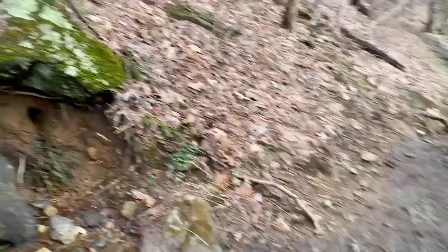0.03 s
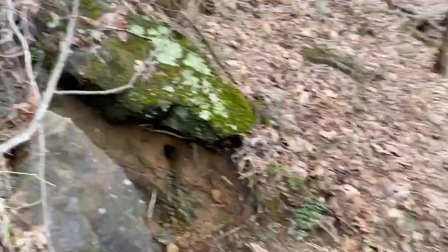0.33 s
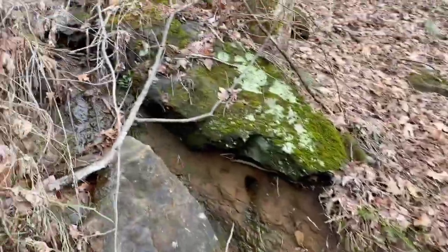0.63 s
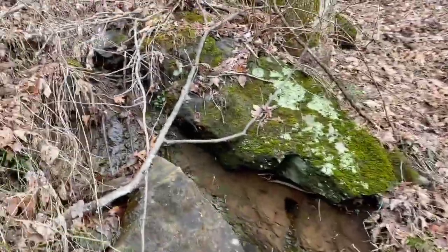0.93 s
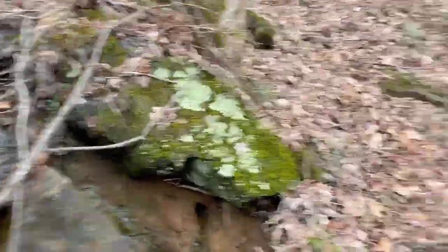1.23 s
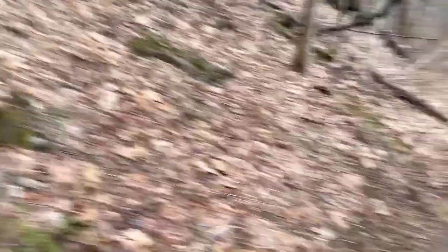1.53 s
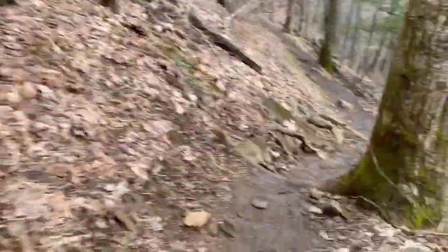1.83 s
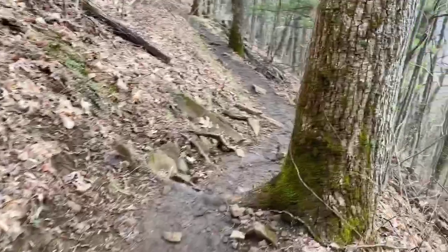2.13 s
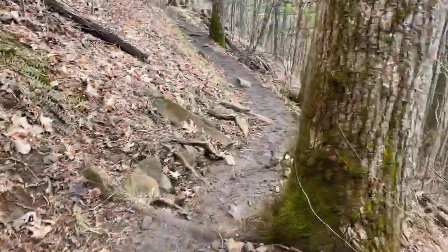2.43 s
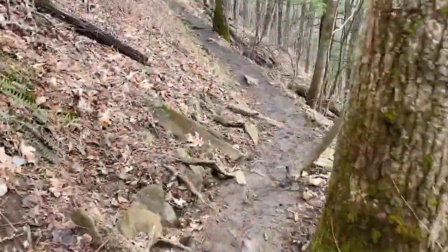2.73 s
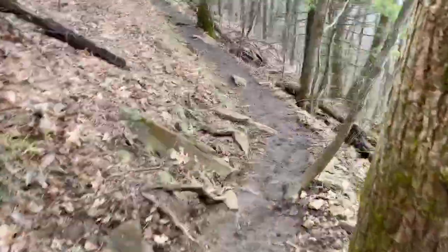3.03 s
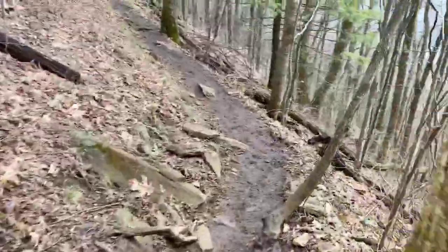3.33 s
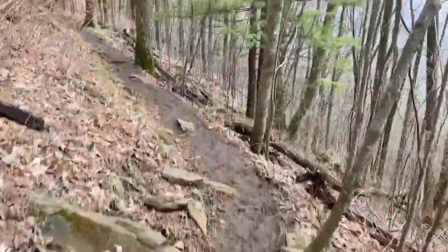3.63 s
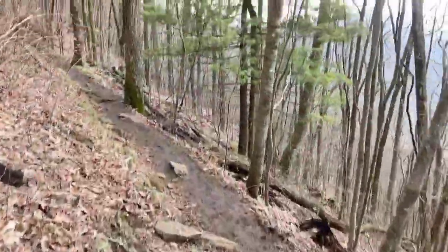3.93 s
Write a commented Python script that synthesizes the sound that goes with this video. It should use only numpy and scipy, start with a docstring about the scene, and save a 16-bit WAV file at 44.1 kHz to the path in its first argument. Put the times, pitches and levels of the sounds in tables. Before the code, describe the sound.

Light steps rustle and crunch along a forest path, with one sharp pole tap halfway and a boot on stone at the end. Low handling bumps and rubs sound on the carried microphone over a faint hiss of water.

```python
"""Walking a leafy trail

Soles scuff dry leaves and grind gravel, and twigs and grit tick. A hiking pole strikes once, and a
boot later crunches on stone. The walker carries a camera: each jolt reaches its microphone as a falling
thump over the low hum of the grip, and fingers rub and flick the case. A trickle hisses faintly behind."""
import sys
import numpy as np
from scipy import signal
from scipy.fft import rfft, irfft
from scipy.io import wavfile
from scipy.ndimage import uniform_filter1d

SR = 44100
rng = np.random.default_rng(int(sys.argv[2]) if len(sys.argv) > 2 else 0)


def transcribe(signal):
    """Save signal, clipped to [-1, 1], as a 16-bit WAV file at the path in sys.argv[1]."""
    frames = np.atleast_2d(signal).T
    limited = np.clip(frames, -1, 1)
    pcm = np.round(limited * 32767).astype(np.int16)
    wavfile.write(sys.argv[1], SR, pcm)


N = 176400
T = np.arange(N) / SR
ALIKE = 0.88  # left-right correlation of close sounds


# Steps in the leaves. Each row: start in seconds, length in seconds, level in dB, treble tilt in dB.
SCUFFS = [(0.416,0.3,-54.5,5), (1.062,0.076,-46.5,11), (1.204,0.052,-46.5,10), (1.233,0.42,-58,7.5),
          (1.774,.36,-51.5,7), (2.367,0.21,-47,11), (2.926,.06,-44,9.5), (2.966,0.16,-52,8.5),
          (3.369,0.27,-54.5,6), (3.884,0.099,-45,4.5)]
# The tone of dry leaves. Each row: frequency in Hz, level in dB.
LEAF_SPECTRUM = [(290, -22), (500, -1), (1320, -2.5), (3960, -18.5), (9420, -27), (11000, -34.5),
                 (15000, -95)]
def scuff(length, db, tilt_db):
    """A sole pushes through dry leaves in a swell of tiny snaps."""
    swell = stroke(length)
    tilt = [(1200, -tilt_db), (8000, tilt_db)]
    return amp(db) * swell * colour(grains(len(swell)), LEAF_SPECTRUM, ripple(), tilt)


# Gravel under a sole. Each row: start in seconds, length in seconds, level in dB.
CRUNCHES = [(1.91,0.043,-46.5), (2.433,0.035,-34), (2.467,0.044,-40.5), (3.886,.025,-33.5)]
# The pitches the pebbles ring at, in Hz.
PEBBLES_HZ = [1263, 1736, 2820, 3940, 4720, 6600]
def crunch(length, db, hits_per_s=500, decay_cycles=5.7):
    """Pebbles knock together at random, each ringing for a few cycles."""
    swell, t = stroke(length), T[:SR // 20]
    out = np.zeros((2, len(swell)))
    for hz in PEBBLES_HZ:
        knocks = noise(len(swell), ALIKE) * (rng.random(len(swell)) < hits_per_s / SR)
        ring = np.sin(2 * np.pi * hz * t) * np.exp(-t * hz / decay_cycles)
        add(out, 0, signal.fftconvolve(knocks, ring[None], axes=1))
    return amp(db) * swell * unit(out)


# Twigs and grit. Each row: start in seconds, relative level in dB, centre in Hz, width in octaves.
TICKS = [(0.492,-37,8200,1.4), (0.5198,-38,1470,0.37), (0.5443,-35.5,1660,0.2), (.68,-29,3980,4.3),
         (0.693,-33.5,8900,1.3), (0.737,-33,2000,0.98), (0.848,-40,2180,1.4), (0.962,-42,5630,0.9),
         (1.015,-35.5,3200,1.2), (1.61,-44.5,2000,0.5), (1.652,-39,2160,0.25), (1.744,-35,3500,16),
         (1.7948,-26.5,3980,5.7), (2.2715,-35.5,9400,1.43), (2.3649,-30.5,3450,1), (2.563,-39.5,3900,2.2),
         (3.085,-35,7400,1.43), (3.3096,-44.5,3550,1.05), (3.4356,-35,4760,0.56), (3.935,-38.5,1160,1.3)]
# The tone of a hard crack, for ticks and stone hits alike. Each row: frequency in Hz, level in dB.
CRACK_SPECTRUM = [(150,-27), (420,7.5), (720,-2.5), (1500,-4), (3800,-11.5), (5500,-12), (8300,-19),
                  (9200,-4.5), (11000,-30)]
def tick(db, hz, octaves, rise_s=0.0022, snap_s=0.0035, settle_s=0.025):
    """A twig or bit of grit snaps around its own pitch, then a few crumbs settle."""
    t = T[:SR // 10]
    grid_hz = 100 * 2 ** (np.arange(30) / 4)
    band = [(f, -20 * np.log10(1 + (np.log2(f / hz) / octaves) ** 2)) for f in grid_hz]
    body = (CRACK_SPECTRUM, band, ripple())
    snap = colour(noise(len(t), ALIKE), *body) * np.exp(-t / snap_s)
    crumbs = amp(-17) * colour(grains(len(t)), *body) * np.exp(-t / settle_s)
    return amp(db + 5) * np.minimum(t / rise_s, 1) * (snap + crumbs)


# Hard hits on stone: the pole's tip, then a boot.
# Each row: start in seconds, level in dB, crack decay in seconds, relative rattle in dB.
STONE_HITS = [(2.1558, -13.5, 0.0076, -10.5), (3.8884, -31, 0.0022, -1.5)]
# The brief ring of a hit. Each row: frequency in Hz, relative level in dB.
HIT_MODES = [(1356,0.5), (1750,8), (1860,5), (2720,1), (3000,2), (3350,-13.5), (3620,0), (3850,1),
             (6250,-2.5), (9150,-21)]
def stone_hit(db, crack_s, rattle_db, rise_s=0.0034, ring_s=0.0022, thud_peak_s=0.01):
    """A pole tip or boot lands on stone with a crack, a brief ring, a rattle and a dull thud."""
    t = T[:SR // 5]
    modes = sum(amp(mode_db) * np.sin(2 * np.pi * (hz * t + rng.random())) for hz, mode_db in HIT_MODES)
    ring = amp(5.5) * modes * np.exp(-t / ring_s)
    thud = colour(noise(len(t), ALIKE), [(80, -5), (200, 12), (480, 1), (800, -43)])
    thud *= amp(-31.5) * bump(t, thud_peak_s)
    crack = colour(noise(len(t), ALIKE), CRACK_SPECTRUM, [(800, -39), (2500, 8.5)]) * np.exp(-t / crack_s)
    second_burst = 0.5 * np.exp(-((t - 0.019) / 0.0028) ** 2)
    rattle = amp(rattle_db) * colour(grains(len(t)), CRACK_SPECTRUM) * (np.exp(-t / 0.01) + second_burst)
    attack = np.minimum(t / rise_s, 1)
    return thud + amp(db) * pan(-0.97) * attack * (crack + ring + rattle)


# Jolts of the camera. Each row: start in seconds, relative level in dB.
JOLTS = [(0.154, -29.5), (0.52, -22.5), (0.674, -32.5), (0.791, -23.5), (1.073, -25), (1.154, -33),
         (1.232, -34.5), (1.311, -30), (1.375, -28.5), (1.514, -26), (1.553, -30.5), (1.747, -25),
         (1.773, -24), (2.181, -28), (2.211, -30), (2.287, -21.5), (2.43, -23), (2.491, -24),
         (2.585, -25.5), (2.662, -31), (2.79, -28), (3.039, -30), (3.093, -26), (3.116, -26.5),
         (3.159, -31), (3.431, -22.5), (3.502, -30), (3.676, -27), (3.814, -29.5), (3.844, -23.5)]
# A jolt's swell at the left, then the right microphone port.
# Each row: peak time in seconds, sharpness, relative level in dB, lag in cycles.
PORTS = [(0.016, 0.82, 1.5, 0), (0.0074, 1.72, 0.5, 0.17)]
def jolt(db, top_hz=321.3, end_hz=52.8):
    """A jolt thumps the microphone, its pitch falling into the hum; it peaks later on the left."""
    t = T[:SR // 8]
    fall_s = rng.uniform(0.0088, 0.009)
    cycles = np.cumsum(end_hz + (top_hz - end_hz) * np.exp(-t / fall_s)) / SR
    roughness = 1 + 0.26 * colour(noise(len(t), ALIKE), [(120, -8), (500, -51), (2000, -91.5)])
    thump = [amp(port_db) * bump(t, peak_s) ** sharpness * np.sin(2 * np.pi * (cycles - lag))
             for peak_s, sharpness, port_db, lag in PORTS]
    return amp(db + 2.5) * roughness * np.array(thump)


# The swells of the grip's hum. Each row: time in seconds, relative level in dB.
GRIP_LEVELS = [(0,-35.5), (.34,-37), (.42,-46.5), (.5,-29), (.62,-27), (.73,-35.5), (.84,-31.5), (1,-36.5),
               (1.28,-28.5), (1.45,-32.5), (1.57,-29.5), (1.9,-37), (2.15,-39.5), (2.6,-28.5), (2.88,-33.5),
               (2.94,-26.5), (3.19,-24), (3.25,-41), (3.42,-29), (4,-30.5)]
def grip_hum(hum_hz=54.87, wander_hz=3.56):
    """The grip on the case makes a low, wavering hum over a soft rumble."""
    drift = unit(uniform_filter1d(uniform_filter1d(rng.standard_normal(N), size=2000), size=2000))
    hum = np.sqrt(2) * np.sin(2 * np.pi * np.cumsum(hum_hz + wander_hz * drift) / SR)
    rumble = colour(noise(N, 0.59), [(20, -37), (40, 2), (80, -9), (300, -40)])
    rumble = signal.sosfilt(signal.butter(4, 400, fs=SR, output="sos"), rumble)
    swells = amp(np.interp(T, *np.transpose(GRIP_LEVELS)))
    return swells * (amp(-4) * hum + amp(-3) * rumble)


# Fingers shifting on the case. Each row: start in seconds, length in seconds, level in dB.
RUBS = [(1.237,0.069,-27.5), (1.886,0.19,-40.5), (2.375,0.096,-30.5), (3.051,0.17,-53)]
# The muffled tone of a rub. Each row: frequency in Hz, level in dB.
RUB_SPECTRUM = [(40,-36), (85,18), (250,2), (500,-23.5), (3000,-47)]
def finger_rub(length, db):
    """A finger rubs the case in a short swell of low noise."""
    swell = stroke(length)
    return amp(db) * swell * colour(noise(len(swell), 0.98), RUB_SPECTRUM)


def flick(rise_s=0.001, decay_s=0.0032):
    """A sharp flick on the case beside the left port: its treble arrives just before its bass."""
    t = T[:SR // 20]
    chirp = np.sin(2 * np.pi * 1.7 * np.log1p(t / 0.0002))
    envelope = (1 - np.exp(-t / rise_s)) * np.exp(-t / decay_s)
    return amp(-16) * pan(11) * envelope * chirp


def tree_echo(sound, decay_s=0.05):
    """The trees scatter a faint, short tail back."""
    t = T[:SR // 2]
    tail = noise(len(t), 0) * np.exp(-t / decay_s)
    return amp(-25) * signal.fftconvolve(sound, tail / np.linalg.norm(tail[0]), axes=1)[:, :N]


# The tone of the background hiss. Each row: frequency in Hz, level in dB.
TRICKLE_SPECTRUM = [(200,-24), (450,-35), (1400,-41.5), (1800,-36.5), (2300,-47), (6800,-46), (8400,-58),
                    (9200,-36), (11000,-68)]
def trickle():
    """A trickle and distant air blend into a steady hiss."""
    return amp(-56.5) * colour(noise(N, 0.31), TRICKLE_SPECTRUM)


def amp(db):
    """Decibels to gain."""
    return 10 ** (np.asarray(db) / 20)


def unit(x):
    """Scales to rms 1."""
    return x / np.sqrt(np.mean(x ** 2) + 1e-20)


def pan(left_db):
    """Stereo gains that favour the left by left_db."""
    return amp([[left_db / 2], [-left_db / 2]])


def stroke(length):
    """An envelope that swells quickly and fades slowly."""
    return np.sin(np.pi * np.linspace(0, 1, max(round(length * SR), 2)) ** 0.55).clip(0) ** 1.1


def bump(t, peak_s):
    """An envelope that rises to 1 at peak_s and dies away."""
    return t / peak_s * np.exp(1 - t / peak_s)


def colour(x, *curves):
    """Filters by the sum of (Hz, dB) curves and scales to rms 1."""
    log_hz = np.log(np.fft.rfftfreq(x.shape[-1], 1 / SR) + 1)
    db = sum(np.interp(log_hz, np.log(curve[:, 0] + 1), curve[:, 1]) for curve in map(np.array, curves))
    return unit(irfft(rfft(x) * amp(db), x.shape[-1]))


def ripple(spread_db=2.2):
    """Chance resonances of one twig or heap of leaves, as a (Hz, dB) curve."""
    return [(hz, spread_db * rng.standard_normal()) for hz in 600 * 2 ** (np.arange(36) / 8)]


def pair(x, alike):
    """Makes two unrelated channels partly alike."""
    return np.array([x[0], alike * x[0] + np.sqrt(1 - alike ** 2) * x[1]])


def noise(size, alike):
    """Stereo white noise."""
    return pair(rng.standard_normal((2, size)), alike)


def grains(size, per_s=900, spread_db=3.5):
    """Dense snaps of unequal strength."""
    strength = amp(spread_db * np.minimum(rng.exponential(1, (2, size)), 4))
    hits = rng.random((2, size)) < per_s / SR
    return pair(strength * hits * rng.choice([-1, 1], (2, size)), ALIKE)


def add(mix, start, sound):
    """Mixes a stereo sound in at start seconds."""
    part = mix[:, round(start * SR):][:, :sound.shape[1]]
    part += sound[:, :part.shape[1]]


def play(source, cues):
    """Sounds a source once per row, at the row's start time."""
    out = np.zeros((2, N))
    for start, *settings in cues:
        add(out, start, source(*settings))
    return out


def scene():
    """The trail underfoot, its echo, the handling of the camera and the trickle behind."""
    trail = play(tick, TICKS) + play(stone_hit, STONE_HITS) + play(scuff, SCUFFS) + play(crunch, CRUNCHES)
    lag_rad = 1.5 * np.tanh(np.fft.rfftfreq(N, 1 / SR) / 1200)
    trail[1] = irfft(rfft(trail[1]) * np.exp(-1j * lag_rad), N)  # the right port hears it later
    trail += tree_echo(trail)
    handling = grip_hum() + play(jolt, JOLTS) + play(finger_rub, RUBS)
    add(handling, start=2.5086, sound=flick())
    return trail + handling + trickle()


def record(dry, edge_hz=11100):
    """The recorder's band limit cuts the top treble."""
    lowpass = signal.firwin(255, edge_hz, window=("kaiser", 7), fs=SR)
    return signal.oaconvolve(dry, lowpass[None], "same")


dry = scene()
out = record(dry)
transcribe(out)
```